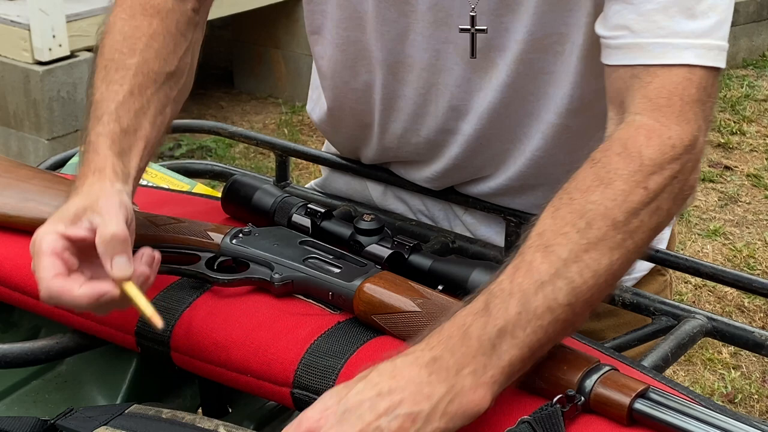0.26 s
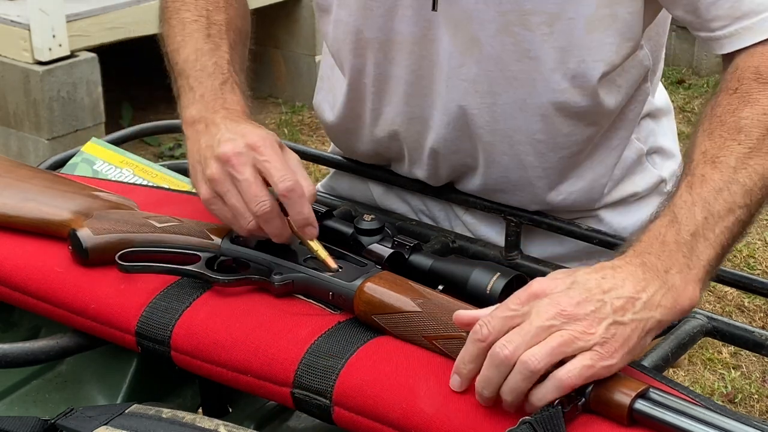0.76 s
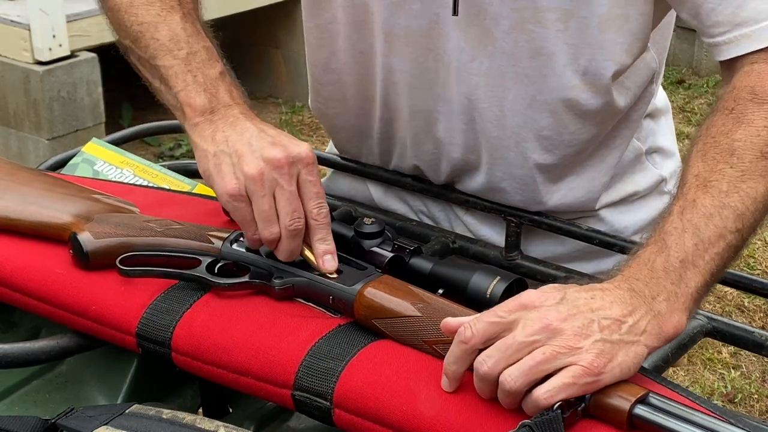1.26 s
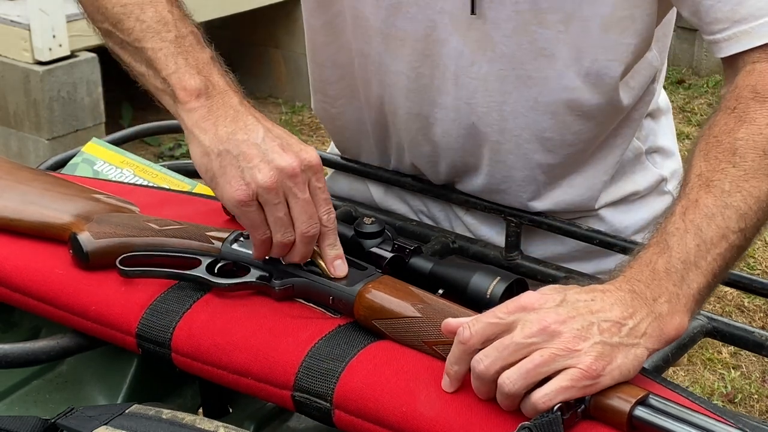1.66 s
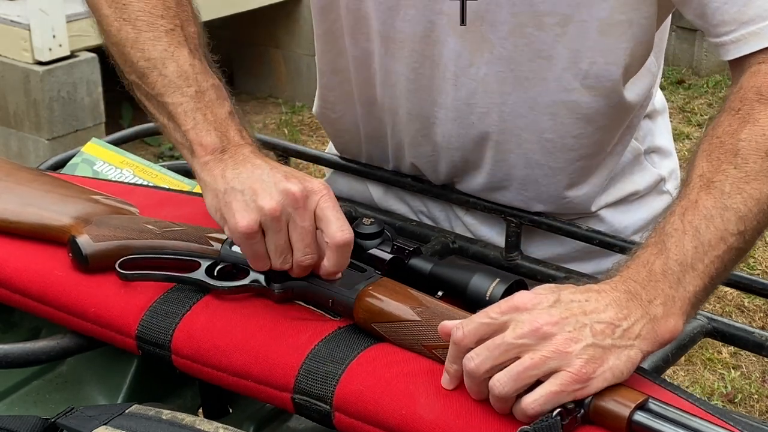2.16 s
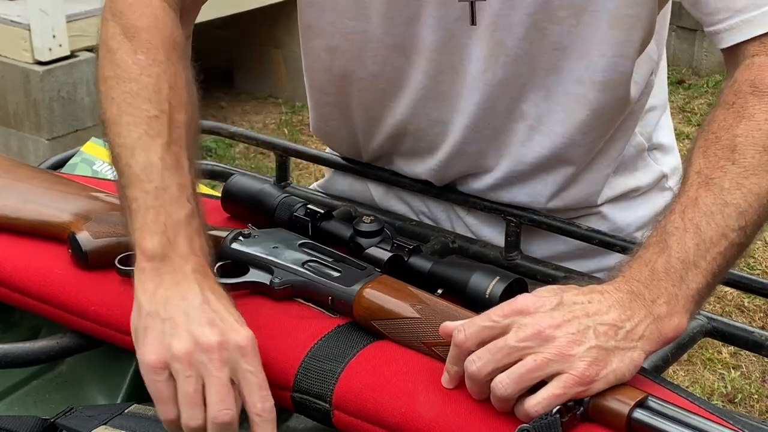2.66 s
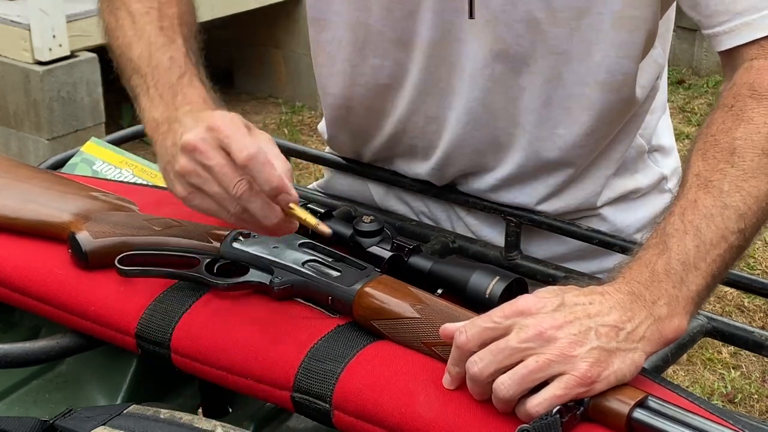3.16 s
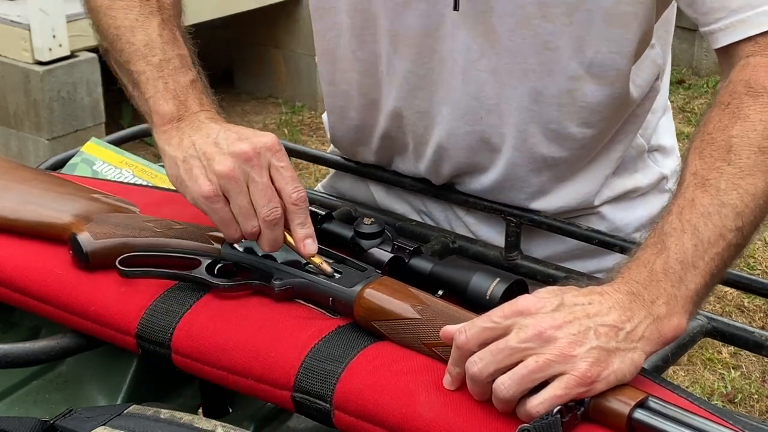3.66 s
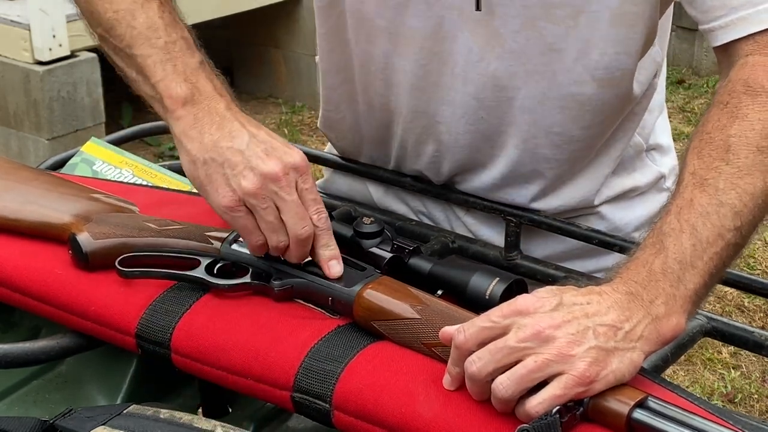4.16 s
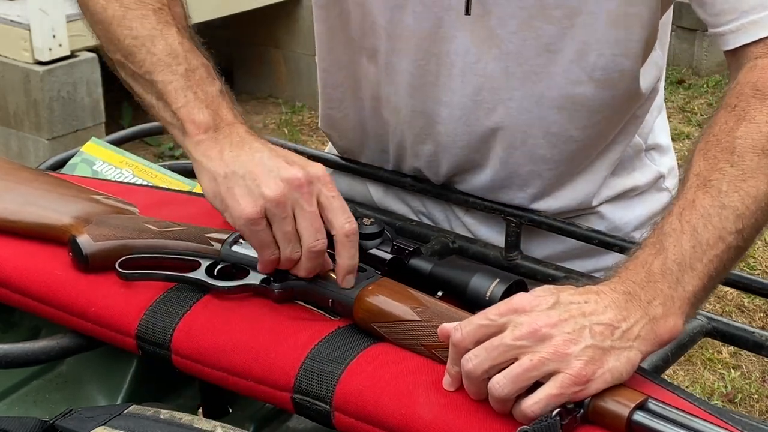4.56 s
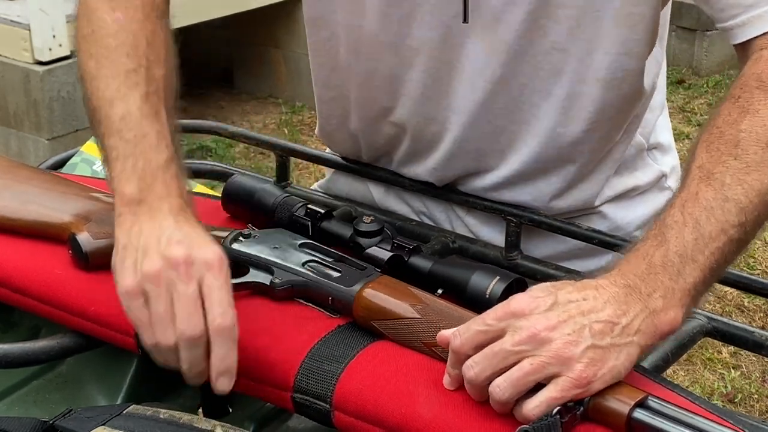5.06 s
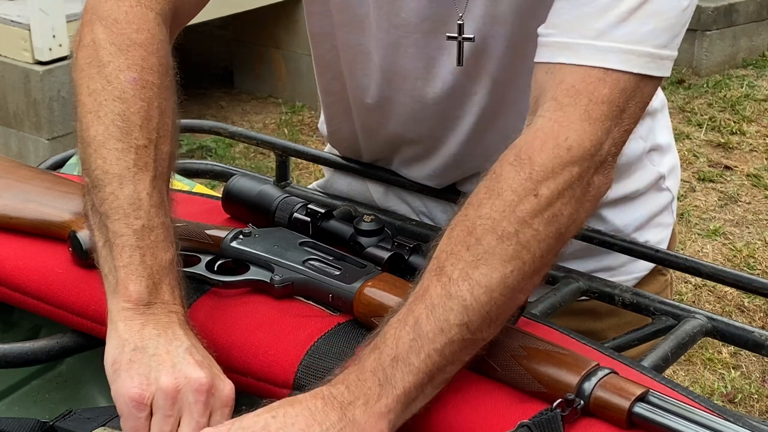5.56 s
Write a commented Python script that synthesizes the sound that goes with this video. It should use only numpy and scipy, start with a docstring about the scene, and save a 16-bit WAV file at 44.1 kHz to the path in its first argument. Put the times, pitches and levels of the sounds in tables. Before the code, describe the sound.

Close outdoor stereo pickup of cartridges being thumbed into a rifle lying on a padded case. Brass ticks and scrapes on steel, the loading gate snaps hard, then a pause; a second round clicks in with a denser rattle and a louder snap. Soft dull thuds come from the stock, with a faint scattered wall echo, steady high insect trill and low distant rumble.

```python
"""Cartridges are thumbed through the loading gate of a rifle that lies on a padded case outdoors. Brass ticks
and scrapes on steel: short pushes and hails of slips set the modes of the rifle ringing, and shaped noise adds
crack and grit. The gate snaps shut and the stock bumps the case; both thud in the stock in two dull notes. A
wall answers with a scattered echo. Insects, noise in narrow resonances, trill over a far rumble of shaped
noise, and two close microphone ports hear it all."""
import sys
import numpy as np
from scipy import signal
from scipy.fft import rfft, irfft
from scipy.io import wavfile
from scipy.ndimage import uniform_filter1d

SR = 44100
rng = np.random.default_rng(int(sys.argv[2]) if len(sys.argv) > 2 else 0)


def to_wav(sig):
    """Store sig (one row per channel, or 1-D mono) as 16-bit WAV at the path in sys.argv[1].

    Samples outside -1..1 are clipped; the rate is SR.
    """
    pcm = np.clip(np.atleast_2d(sig), -1, 1) * 32767
    pcm = np.round(pcm).astype(np.int16)
    wavfile.write(sys.argv[1], SR, pcm.T)  # frames by channels


N = 255780   # samples

# Brass touching steel: t/s, relative level/dB, pitch of the contact f/Hz, sharpness/dB
BRASS_CONTACTS = [(0.644, -21, 1340, -20.5), (0.6534, -24, 1460, -23), (0.7225, -44, 1850, -23),
                  (1.075, -44.5, 1900, -31.5), (1.112, -35, 1840, -38), (1.1227, -23.5, 1770, -39),
                  (1.136, -15.5, 1900, -17.5), (1.145, -23, 1770, -21), (1.198, -43, 2370, -14),
                  (1.2401, -31.5, 2050, -8), (1.3106, -25, 1950, -12), (1.3365, -16, 3500, -18.5),
                  (1.6902, -35, 2420, -32.5), (1.712, -33.5, 2500, -8.5), (1.7491, -39, 2140, -23),
                  (1.8213, -32, 2300, -11), (1.84, -29.5, 2020, -4.5), (1.8614, -21.5, 2180, -47),
                  (1.8749, -17.5, 3200, -16), (1.9445, -34.5, 2350, -4.5), (1.9972, -31, 2000, -2),
                  (2.018, -31, 2300, -33), (2.057, -32, 2280, -16), (2.209, -55, 2300, -20.5),
                  (2.284, -38, 1490, -19), (2.291, -35, 1870, -20), (2.3039, -36.5, 1730, -8),
                  (2.3103, -19.5, 1800, -5), (2.3167, -13, 1663, -6), (2.7805, -53, 2580, 3),
                  (3.346, -18.5, 1847, -14), (3.68, -50.5, 1900, -28), (3.712, -49.5, 1850, -37.5),
                  (3.74, -49, 1800, -28), (3.762, -27, 1670, -48.5), (3.7715, -23.5, 1600, -26),
                  (3.7791, -14, 1660, -12), (3.7925, -27, 1840, -17.5), (3.9053, -25, 1950, -34),
                  (3.9524, -18, 3560, -18.5), (3.9611, -32, 2080, -5.5), (4.13, -50.5, 1900, -32),
                  (4.1743, -37.5, 1680, -15.5), (4.2819, -48.5, 1830, -8), (4.3348, -37.5, 1860, -4.5),
                  (4.3438, -29.5, 1790, -17), (4.351, -23, 2020, -4.5), (4.3984, -38, 2100, 1),
                  (4.4082, -37, 2210, -1.5), (4.4148, -23.5, 2300, -17), (4.4234, -25, 2140, -6.5),
                  (4.439, -31, 2330, -11), (4.4798, -29.5, 1840, -25), (4.528, -14.5, 3270, -24),
                  (4.5458, -30, 2050, -2), (4.581, -21.5, 2280, -6.5), (4.6358, -25.5, 1530, -12),
                  (4.6796, -26.5, 2000, -14.5), (4.828, -44, 1830, -6.5), (4.858, -22, 1040, -27),
                  (4.867, -14, 3530, -5), (4.8708, -8, 1660, -6), (4.883, -24.5, 1860, -20.5),
                  (5.3904, -52, 3040, -6), (5.4388, -38.5, 2770, -6.5), (5.632, -46, 2180, -16),
                  (5.7213, -53, 3000, -11), (5.758, -51, 2200, -8)]
# Sliding contact, one curve a movement: t/s, pressure as level of the steel ring/dB
SLIDE_PRESSURES = [
    [(0.6, -87), (0.63, -62.5), (0.86, -66), (0.96, -61.5), (1.04, -65), (1.065, -77)],
    [(1.075, -66), (1.11, -51), (1.155, -55), (1.19, -71)],
    [(1.19, -72), (1.262, -43), (1.277, -55.5), (1.29, -41), (1.32, -43.5), (1.36, -65), (1.46, -88)],
    [(1.65, -92), (1.665, -60), (1.7, -78), (1.77, -62), (1.8, -59)],
    [(1.8, -60), (1.83, -43.5), (1.855, -55.5), (1.888, -38), (1.91, -56), (1.94, -47)],
    [(1.94, -43.5), (1.955, -51), (1.985, -47.5), (2.045, -47), (2.072, -65), (2.17, -74), (2.24, -97)],
    [(2.27, -81.5), (2.3, -54), (2.335, -46)],
    [(2.66, -102), (2.7, -74.5), (2.85, -74), (2.9, -72.5), (2.93, -63.5), (2.98, -93)],
    [(3.67, -76), (3.73, -65), (3.77, -53)],
    [(3.77, -41), (3.82, -66), (3.875, -58), (3.92, -44.5), (3.945, -51.5), (3.975, -55), (4.0, -68)],
    [(4.27, -76.5), (4.365, -58), (4.39, -92)],
    [(4.396, -53), (4.45, -39.5), (4.468, -46), (4.495, -62)],
    [(4.495, -61), (4.52, -49.5), (4.53, -44.5), (4.555, -42), (4.582, -40), (4.597, -59.5), (4.625, -44),
     (4.67, -56), (4.692, -55)],
    [(4.692, -68), (4.8, -72), (4.85, -67), (4.895, -79)],
    [(5.05, -78.5), (5.12, -68.5), (5.16, -59.5), (5.19, -50), (5.215, -66.5), (5.27, -99)],
    [(5.43, -71), (5.45, -70.5), (5.52, -63.5), (5.56, -81), (5.6, -66), (5.66, -79.5), (5.7, -78.5),
     (5.73, -65), (5.8, -91.5)],
]
# What rubs in each movement: ring at the start f/Hz, ring at the end f/Hz, grit over ring level/dB,
# treble lift of the grit level/dB, stock over ring level/dB (the levels hold at mean pressure)
SLIDE_SURFACES = [(1930, 1940, -2.5, 5, -10), (1840, 1400, -8.5, 4, -12), (2250, 2300, -5.5, 10.5, -8.5),
                  (2160, 1970, -6, -3, -14), (2280, 2130, -2.5, 9.5, -9), (2340, 1900, -5.5, 11, -11.5),
                  (1800, 1100, -9.5, -3.5, -9.5), (2130, 3400, 3.5, 3.5, -12.5), (1900, 1840, -26, -8, -11),
                  (2000, 1920, -3.5, 5.5, -5), (1710, 2100, -8, 3, -10), (2200, 2300, -6.5, 10, -2.5),
                  (2280, 1920, -0.5, 9.5, -5), (1840, 2600, -6, -6, -2.5), (2106, 1690, -0.5, 1, -3),
                  (2740, 2300, 5.5, 1, -5)]
# Modes of the rifle: f/Hz, relative level/dB, free decay t60/s
RIFLE_MODES = [(520, -31, 0.01), (762.4, -9, 0.05), (1060, -7.5, 0.013), (1546, -12.5, 0.06),
               (1683, -6, .016), (1799, 1.5, 0.025), (2109, -9, 0.038), (2323, -15.5, 0.029),
               (2510, -4, 0.034), (2728, -8, 0.029), (3020, 2, 0.012), (3330, 2, 0.01), (3870, -4.5, .012),
               (4530, 0, 0.052), (5616, -14, .015), (5480, -3, 0.055), (6700, -7.5, 0.053),
               (6960, -4.5, .015)]
# Noise spectrum of a contact's crack: f/Hz, relative level per Hz/dB
CRACK_SPECTRUM = [(2000, -14), (3300, -3.5), (5000, -3), (7500, -2.5), (9000, -4.5), (12000, -16),
                  (15000, -25), (17000, -22.5)]
# Noise spectrum of the sliding grit: f/Hz, relative level per Hz/dB
GRIT_SPECTRUM = [(2500, -1.5), (3300, 1.5), (5000, -4), (7500, -1.5), (9000, -9), (12000, -12.5),
                 (15850, -10.5), (16300, -37)]
# Thuds in the stock, from bumps on the padded case and the gate snapping shut: t/s, low note relative level/dB,
# high note relative level/dB
STOCK_THUDS = [(0.647, -53, -65), (1.03, -45, -57), (1.136, -50, -43), (2.048, -58.5, -42),
               (2.32, -32, -34.5), (3.351, -58.5, -40), (3.78, -45.5, -29), (3.919, -60, -43.5),
               (4.876, -28, -27), (5.173, -54, -42.5), (5.637, -40.5, -42.5), (5.673, -43.5, -44.5),
               (5.739, -43.5, -47)]
# Dull notes of the stock: f/Hz, decay t60/s
STOCK_NOTES = [(188, 0.21), (325, 0.086)]
# Nearest insect: t/s, running number of the call
NEAR_CALL_COUNT = [(-.07, 0), (.534, 9), (1.163, 18), (2.4, 36), (3.277, 49), (3.584, 54), (4.067, 61),
                   (4.996, 75), (5.823, 87)]
# Wing resonances of the nearest insect: f/Hz, width/Hz, relative level/dB
WING_RESONANCES = [(6060, 100, 0), (6310, 28, -1)]
# Resonances shared by all insects: f/Hz, width/Hz, relative level/dB
CHORUS_RESONANCES = [(5600, 170, -11), (6324, 700, -1), (7200, 270, -15), (7600, 880, -13)]
# Noise spectrum of the outdoor air: f/Hz, relative level per Hz/dB
AIR_SPECTRUM = [(25, -26), (40, -8), (65, 0), (110, -5.5), (200, -14), (400, -21.5), (800, -33),
                (1300, -45), (3500, -50.5), (5000, -63.5), (9000, -51), (12000, -39), (14000, -46),
                (15850, -46), (16100, -66)]
# Likeness of the air at the two ports: f/Hz, left-right correlation (1 = the same)
AIR_PORT_LIKENESS = [(60, 0.99), (200, 0.48), (700, 0.24), (1300, 0.14), (2000, 1), (16000, 0.29)]
# Phase between the ports: f/Hz, lead of the right port over the left/cycles
RIGHT_PORT_LEAD = [(20, 0), (7250, 0), (8750, .48), (9350, .52), (10700, .99), (11400, 1.01), (13000, 1.48),
                   (13700, 1.52), (15000, 1.99), (22000, 2)]

RISE_CYCLES, RISE_SPREAD_DB = 2.53, 2.1   # cycles of the contact's pitch to full force, and their chance spread
HELD = .42   # a blow rings this share of the free decay, under the hand
MEAN_PRESSURE_DB = -55
CATCH_DB, CATCHES_PER_S = 2.5, 45   # the pressure wavers as brass catches and frees
GRIT_FOLLOWS, TREBLE_FOLLOWS, STOCK_FOLLOWS = 0.94, 0.35, 0.82   # dB per dB of pressure
SLIPS_PER_S, SNAGS_PER_S, SNAG_DB = 3000.0, 140.0, 11   # all slips, the hard snags among them, their boost
NEAR_INSECT_DB, FAR_INSECTS_DB = -72.5, -72.5
AIR_DB = -55
CUTOFF_HZ = 16700


def from_db(db):
    """Gain of a level in dB."""
    return 10 ** (np.asarray(db) / 20)


def rms_one(x):
    """Scaled to rms 1."""
    return x / np.sqrt(np.mean(x ** 2) + 1e-20)


def at_hz(points, hz):
    """A table of (Hz, value) read on a log-frequency axis."""
    table_hz, values = np.array(points).T
    return np.interp(np.log(hz), np.log(table_hz), values)


def drift(rate_hz):
    """Smoothed chance with a spread of about 1, computed every 40 samples and joined by lines."""
    r = np.exp(-2 * np.pi * rate_hz * 40 / SR)
    noise = rng.standard_normal(N // 40 + 2002)
    slow = signal.lfilter([1], [1, -2 * r, r * r], noise)[2000:]   # skip the settling of the filter
    return np.interp(np.arange(N) / 40, np.arange(len(slow)), rms_one(slow))


def coloured(x, spectrum):
    """The signal weighted by a spectrum in dB."""
    hz = np.maximum(np.fft.rfftfreq(N, 1 / SR), 1)
    return irfft(rfft(x) * from_db(at_hz(spectrum, hz)), N)


def ring(x, hz, t60):
    """A two-pole resonator: a unit click sets a decaying sine of starting height 1 ringing."""
    r = from_db(-60 / (t60 * SR))
    w = 2 * np.pi * hz / SR
    return signal.lfilter([0, np.sin(w)], [1, -2 * r * np.cos(w), r * r], x + 1e-18)


def resonant(x, peaks):
    """Parallel resonances of (Hz, width Hz, dB), together at rms 1."""
    total = np.zeros(N)
    for hz, width, db in peaks:
        t60 = np.log(1000) / (np.pi * width)
        total += from_db(db) * ring(x, hz, t60) * width
    return rms_one(total)


def pushes(at, heights, rise_s):
    """Force of each contact: it swells for its rise time and fades."""
    out = np.zeros(N + 800)
    span = np.arange(800)
    u = span / SR / np.clip(rise_s, .0002, .003)[:, None]   # time in rise times
    np.add.at(out, at[:, None] + span, heights[:, None] * u * np.exp(1 - u))
    return out[:N]


def contacts():
    """Each contact chatters briefly and drives the modes near its own pitch hardest; gives ring and crack."""
    s, level_db, pitch_hz, sharp_db = np.transpose(BRASS_CONTACTS)
    at = np.round(s * SR).astype(int)
    luck_db = 0.93 * rng.standard_normal((len(at), len(RIFLE_MODES)))
    rise_s = RISE_CYCLES / pitch_hz * from_db(RISE_SPREAD_DB * rng.standard_normal(len(at)))
    chatter = rng.choice([-1, 1], N)   # random sign of the force, sample by sample
    rings = np.zeros(N)
    for k, (hz, mode_db, t60) in enumerate(RIFLE_MODES):
        near_db = -14 * np.minimum(np.abs(np.log2(hz / pitch_hz)), .8)   # loss per octave from the pitch
        bright_db = sharp_db * np.clip(np.log2(hz / 2400), 0, 1)
        drive_db = level_db + mode_db + near_db + bright_db + luck_db[:, k] - 19
        heights = from_db(drive_db) / np.sqrt(rise_s / 0.00065)   # a longer push is made weaker
        force = pushes(at, heights, rise_s) * np.roll(chatter, 97 * k)
        rings += ring(force, hz, HELD * t60)
    crack_force = pushes(at, from_db(level_db + sharp_db - 2), rise_s)
    cracks = crack_force * rms_one(coloured(rng.standard_normal(N), CRACK_SPECTRUM))
    return rings, cracks


def slide_controls():
    """Pressure sets the steel, grit, treble and stock levels of each movement; the ring's pitch glides."""
    t = np.arange(N) / SR
    steel_db, grit_db, treble_db, stock_db = np.full((4, N), -120.)
    pitch_hz = np.full(N, 2000.)
    for curve, surface in zip(SLIDE_PRESSURES, SLIDE_SURFACES):
        start_hz, end_hz, grit_over, treble_lift, stock_over = surface
        s, pressure_db = np.transpose(curve)
        during = (t >= s[0]) & (t < s[-1])
        swing_db = np.interp(t[during], s, pressure_db) - MEAN_PRESSURE_DB
        steel_db[during] = MEAN_PRESSURE_DB + swing_db
        grit_db[during] = MEAN_PRESSURE_DB + grit_over + GRIT_FOLLOWS * swing_db
        treble_db[during] = treble_lift + TREBLE_FOLLOWS * swing_db
        stock_db[during] = MEAN_PRESSURE_DB + stock_over + STOCK_FOLLOWS * swing_db
        pitch_hz[during] = np.interp(t[during], s[[0, -1]], [start_hz, end_hz])
    return steel_db, grit_db, treble_db, stock_db, pitch_hz


def slides():
    """Sliding is a dense hail of uneven slips into the rifle's modes, with hissing grit on top."""
    steel_db, grit_db, treble_db, stock_db, pitch_hz = slide_controls()
    steel_gain, grit_gain, stock_gain = (
        uniform_filter1d(from_db(db), size=200) for db in (steel_db, grit_db, stock_db))

    sizes = from_db(3.5 * np.minimum(rng.exponential(1, N), 5)) * rng.choice([-1, 1], N)
    draw = rng.random(N) * SR
    slips = sizes * (draw < SLIPS_PER_S) * from_db(SNAG_DB * (draw < SNAGS_PER_S))
    catching = from_db(CATCH_DB * drift(CATCHES_PER_S))
    modes = [from_db(db) * ring(np.roll(slips, k * 7), hz, 1.2 * t60)
             for k, (hz, db, t60) in enumerate(RIFLE_MODES)]

    # a light rub spreads over many modes, a firm one squeals: dB per octave away from the pitch
    focus_db = np.interp(steel_db, [-68, -52], [-12, -70])
    # the ring follows the point of contact, over ten middle modes
    near = [from_db(focus_db * np.abs(np.log2(hz / pitch_hz))) for hz, _, _ in RIFLE_MODES[2:12]]
    steel = sum(rms_one(mode) * weight for mode, weight in zip(modes[2:12], near))
    steel = steel / np.sqrt(sum(weight ** 2 for weight in near))

    grit = rms_one(coloured(slips + 1.9 * rng.standard_normal(N), GRIT_SPECTRUM))
    treble = signal.sosfilt(signal.butter(4, 8500, "high", fs=SR, output="sos"), grit)
    grit = grit + treble * (from_db(treble_db) - 1)
    stock = rms_one(sum(modes[:3]))   # the lowest modes
    return catching * (steel_gain * steel + grit_gain * grit + stock_gain * stock)


def thuds():
    """Wood and padding give two dull notes, slow to start."""
    s, *notes_db = np.transpose(STOCK_THUDS)
    out = np.zeros(N)
    for (hz, t60), level_db in zip(STOCK_NOTES, notes_db):
        blows = np.zeros(N)
        blows[np.round(s * SR).astype(int)] = from_db(level_db)
        push = signal.lfilter([.025], [1, -.985], blows)   # each blow becomes a soft, fading push
        knock = 2.2 * ring(push, 2.3 * hz, 0.02)   # a short knock rides on each note
        out += ring(push, hz, t60) + knock
    return signal.sosfilt(signal.butter(2, 110, "high", fs=SR, output="sos"), out)


def wall(x):
    """A scattered echo off a nearby wall swells after the delay and dies away; farther things add a faint tail."""
    delay_s, swell_s, far_s = .012, .013, .065
    t = np.arange(round(.25 * SR)) / SR
    envelope = t / swell_s * np.exp(-t / swell_s) + 0.085 * np.exp(-t / far_s)
    shared, opposed = rng.standard_normal((2, len(t))) * envelope
    scatter = shared + .1 * opposed * np.array([[1], [-1]])
    scatter = np.pad(scatter, [(0, 0), (round(delay_s * SR), 0)])
    return from_db(-44.5) * signal.fftconvolve(x[None], scatter, axes=1)[:, :N]


def near_insect():
    """Noise pulsed in pairs of short chirps rings the wing resonances, then those of the chorus."""
    s, number = np.transpose(NEAR_CALL_COUNT)
    place = np.interp(np.arange(N) / SR, s, number) % 1   # position within a call, 0 to 1
    chirps = np.zeros(N)
    for middle, db in [(0, -0.69), (.64, -1.3)]:
        offset = (place - middle + .5) % 1 - .5
        chirps += from_db(db) * np.exp(-(offset / 0.049) ** 2)
    wings = resonant(chirps * rng.standard_normal(N), WING_RESONANCES)
    return resonant(wings, CHORUS_RESONANCES) * from_db(NEAR_INSECT_DB + 0.92 * drift(4.5))


def far_insects():
    """The far ones merge into a throbbing band: noise through the chorus resonances twice."""
    band = resonant(resonant(rng.standard_normal(N), CHORUS_RESONANCES), CHORUS_RESONANCES)
    return band * from_db(FAR_INSECTS_DB + 1.5 * drift(30))


def air():
    """Far rumble and faint hiss; shared and opposed noise set how alike the ports are at each pitch."""
    mid, side = rng.standard_normal((2, N))
    alike = [(hz, np.clip(c, 0, .999)) for hz, c in AIR_PORT_LIKENESS]
    mid = coloured(mid, [(hz, 10 * np.log10(1 + c)) for hz, c in alike])
    side = coloured(side, [(hz, 10 * np.log10(1 - c)) for hz, c in alike])
    both = rms_one(coloured(np.array([mid + side, mid - side]), AIR_SPECTRUM))
    swell_db = .8 * drift(1.0)
    return from_db(AIR_DB + swell_db) * both * from_db([[.5], [-.5]])   # left a touch louder


def scene():
    """The rifle in front, its low tones a little to the left; hits reach the ports by slightly different paths."""
    rings, cracks = contacts()
    hits = rings + cracks
    rifle = hits + slides() + thuds()
    low = signal.sosfilt(signal.butter(2, 1300, fs=SR, output="sos"), rifle)
    side = .15 * low + 0.11 * np.roll(hits, 23)   # late hits, opposed in the two ports
    front = rifle + side * np.array([[1], [-1]])
    echo = wall(0.33 * rings + cracks)
    return front + echo + near_insect() + far_insects() + air()


def record(dry):
    """The two ports turn against each other in phase through the treble; the top is cut."""
    hz = np.maximum(np.fft.rfftfreq(N, 1 / SR), 1)
    half_lead = np.pi * at_hz(RIGHT_PORT_LEAD, hz)   # radians, half the lead for each port
    turn = np.exp(1j * half_lead * np.array([[-1], [1]]))
    ports = irfft(rfft(dry) * turn, N)
    return signal.sosfilt(signal.cheby2(24, 70, CUTOFF_HZ, fs=SR, output="sos"), ports)


dry = scene()
out = record(dry)
to_wav(out)
```